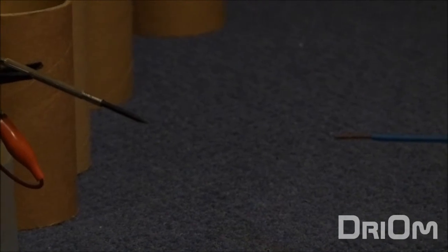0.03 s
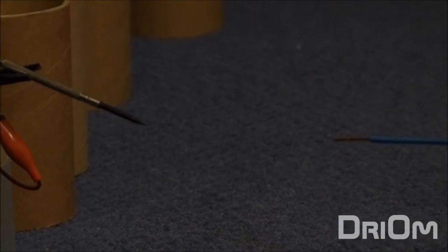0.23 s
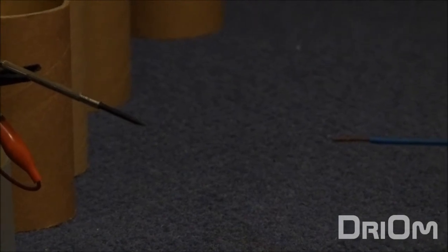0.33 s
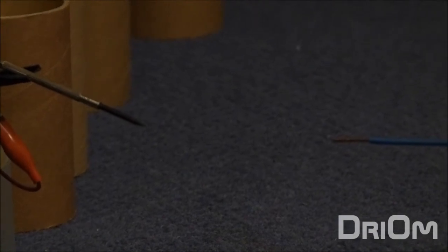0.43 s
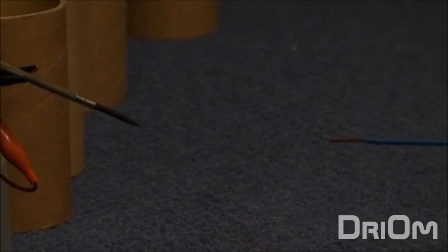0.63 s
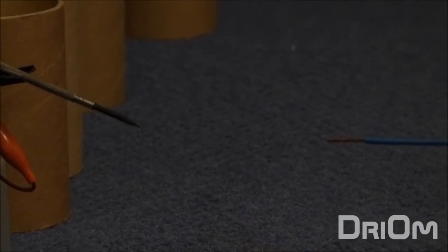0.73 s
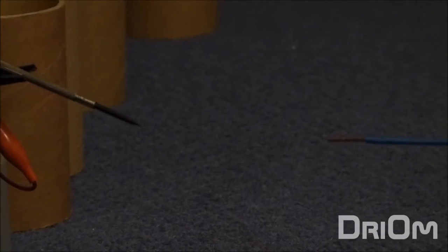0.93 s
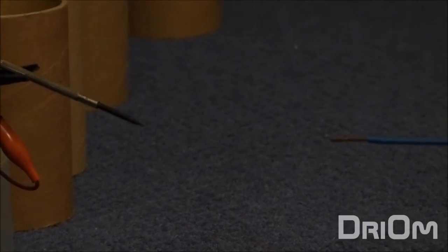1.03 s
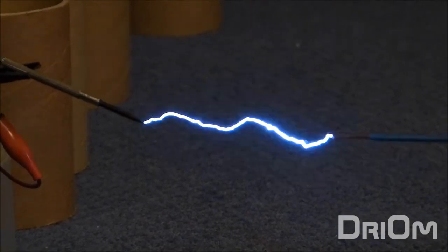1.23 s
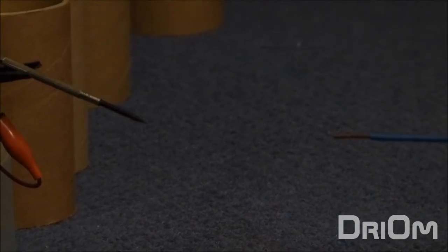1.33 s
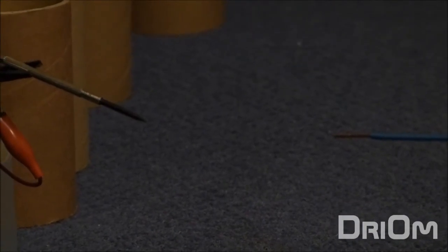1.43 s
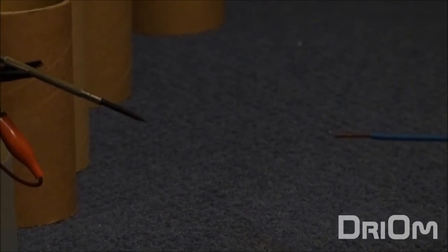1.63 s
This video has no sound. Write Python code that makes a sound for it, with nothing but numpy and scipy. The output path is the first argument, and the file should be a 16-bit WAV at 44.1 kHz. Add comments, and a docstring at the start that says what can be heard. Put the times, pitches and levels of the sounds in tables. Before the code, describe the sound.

An electric spark jumps a gap with a loud, sharp crack. A weaker, brighter snap follows, then another as loud as the first. Each is close to the microphone and rings briefly in a small, quiet room.

```python
"""A small, quiet room hushes and rumbles. Close to a stereo recorder, a high-voltage spark jumps an air gap:
its shock front cracks and overloads the microphones into a dull knock, slaps come off nearby surfaces,
and a bright tail rings out while the limiter, ducked by the hit, slowly recovers.
A weaker, brighter spark follows, then a third as strong as the first, dying away into the room tone."""
import sys
import numpy as np
from scipy import signal
from scipy.fft import rfft, irfft
from scipy.io import wavfile
from scipy.ndimage import uniform_filter1d

SR = 44100
rng = np.random.default_rng(int(sys.argv[2]) if len(sys.argv) > 2 else 0)


def store_pcm(level_fs):
    """Save levels as 16-bit WAV."""
    pcm = np.round(np.clip(level_fs, -1, 1) * 32767).astype(np.int16)
    wavfile.write(sys.argv[1], SR, np.atleast_2d(pcm).T)


N = 74970

# the hits: t/s, level/dB, crackle decay/ms, trims for crackle/dB, knock/dB, snap/dB, thump/dB and room/dB,
# brightness/(dB per octave)
SPARKS = [(0.2220, 9, .6, 0.5, -2.5, -3, 2, 0, -0.57), (0.8770, -3, .7, 3, -3.5, -5, -24.5, 2.5, 0.98),
          (1.3004, 8.5, 0.51, -0.5, -4.5, -1, -3.5, -1.5, -0.5)]
# direct sound and slaps, gap to microphones: delay/ms, level/dB, left minus right/dB, crackle/dB
SHOCK_PATHS = [(0, 0.5, -3.5, -3), (1.153, -1, 4.5, 1), (2.62, -4, 1.5, 0), (6.754, -7.5, 9.5, -10.5),
               (8.564, -0.5, -1.5, -7.5), (9.316, -3.5, 11, -2.5), (13.31, -5.5, 0.5, -9),
               (22.08, -13, -9, -8)]
# tone of the crack as the microphones hear it: f/Hz, level/dB
CRACK_EQ = [(60, -32), (300, -29), (800, -20), (1500, -19), (2200, -17.5), (3500, -20.5), (5500, -5.5),
            (6200, -8), (7900, 0.5), (10000, -6.5), (12000, -14), (15500, -18)]
# low knock of the overloaded microphones: f/Hz, level/dB
KNOCK_EQ = [(40, -25.5), (180, -22), (350, -10), (700, 3.5), (1000, 2.5), (1450, -12.5), (3000, -23.5),
            (16000, -60)]
# their midrange snap: f/Hz, level/dB
SNAP_EQ = [(40, -48.5), (1000, -24), (1600, -14), (2200, -3), (3100, .5), (3600, -13.5), (6000, -21.5),
           (16000, -50)]
# the thump that pushes them opposite ways: f/Hz, level/dB
THUMP_EQ = [(40, -25.5), (130, -17), (300, -4), (600, -1.5), (1100, -2.5), (2200, -5.5), (5000, -29),
            (16000, -49.5)]
# tone and length of the room tail: f/Hz, level/dB, t60/s
TAIL_BANDS = [(60, -35, .4), (250, -30.5, 0.52), (770, -24.5, .44), (1174, -17.5, .42), (2080, -14.5, .38),
              (2770, -10.5, 0.37), (3600, -10, .36), (5000, -3, 0.33), (8000, 1, 0.27), (10200, -3.5, 0.24),
              (12500, -15.5, .225), (16000, -26, .2)]
# narrow resonances of things in the room: f/Hz, width/Hz, level/dB, t60/s
OBJECT_RINGS = [(946, 19, -62, 0.74), (1236, 150, -50.5, .4), (1540, 100, -41, .24), (4043, 160, -37, .37)]
# colour of the steady room tone: f/Hz, level/dB
ROOM_TONE_EQ = [(10, -2.5), (25, 1), (60, -3.5), (120, -7), (300, -8.5), (600, -9.5), (1100, -10),
                (2000, -16), (4000, -20), (9000, -23), (15500, -29.5)]
# its stereo width, side against mid: f/Hz, level/dB
ROOM_TONE_WIDTH = [(30, -10), (150, -4.5), (1000, 1.5), (8000, -8)]
# fader ride on its low rumble: t/s, level/dB
RUMBLE_RIDE = [(0, 5), (.2, 0), (.35, -3), (.48, -2), (.56, 3.5), (.8, 2.5), (1.0, -4), (1.1, 2),
               (1.22, 4.5), (1.38, -1.5), (1.55, -4), (1.659, 5.5)]

CRACK_DB, KNOCK_DB, SNAP_DB, THUMP_DB, TAIL_DB, ROOM_TONE_DB = 20, 12.5, 21, 12, 22.5, -65  # layer faders
SIZE = 32768  # samples in one spark with its tail
AGE, FREQ = np.arange(SIZE) / SR, np.fft.rfftfreq(SIZE, 1 / SR)
OPPOSED = np.array([[1], [-1]])  # left and right in opposite polarity


def sparks(tilt_pivot_hz=6000):
    """Every spark fires its shock into the same room; the weak one is brighter and overloads less."""
    tail, out = room_tail(), np.zeros((2, N + SIZE))
    octaves = np.log2(np.maximum(FREQ / tilt_pivot_hz, .5))
    for at_s, db, decay_ms, crackle_db, knock_db, snap_db, thump_db, room_db, tilt_db in SPARKS:
        tilt = causal(undb(tilt_db * octaves))
        air = tilt * (shock(decay_ms, crackle_db) + undb(room_db) * tail)
        start = int(at_s * SR)
        out[:, start:start + SIZE] += undb(db) * irfft(air + mic_overload(knock_db, snap_db, thump_db))
    return out[:, :N]


def shock(decay_ms, crackle_db, size=2048):
    """Spectrum of the front along each path, trailed by crackle from the bends of the spark channel."""
    arrivals = np.zeros((2, size))
    for delay_ms, db, pan_db, scatter_db in SHOCK_PATHS:
        crackle = stereo_noise(side_db=-7, size=size) * np.exp(-AGE[:size] * 1000 / decay_ms)
        front = undb(scatter_db + crackle_db) * crackle / np.sqrt(np.sum(crackle ** 2) / 2)
        front[:, 0] += 1  # the clean click of the front itself
        arrivals += undb(db) * pan(pan_db) * np.roll(front, int(delay_ms * SR / 1000), axis=1)
    return rfft(arrivals, SIZE) * causal(undb(CRACK_DB + eq_curve(CRACK_EQ, FREQ)))


def mic_overload(knock_db, snap_db, thump_db, lag_s=0.00017):
    """Spectrum of the microphones recovering from the front: centred knock and snap, lopsided thump."""
    knock = undb(KNOCK_DB + knock_db + eq_curve(KNOCK_EQ, FREQ))
    snap = undb(SNAP_DB + snap_db + eq_curve(SNAP_EQ, FREQ))
    thump = undb(THUMP_DB + thump_db + eq_curve(THUMP_EQ, FREQ))
    lag = np.exp(-2j * np.pi * FREQ * lag_s)
    return (causal(np.hypot(knock, snap)) + causal(thump) * OPPOSED) * lag


def room_tail(onset_s=0.0057, early_db=2, early_s=0.0098, grain_db=2.5, merge_s=0.028, side_db=-10):
    """Spectrum of the reverb: uneven echoes merge into a tail that loses treble first; objects ring on."""
    grain = np.log(undb(grain_db * np.exp(-AGE / merge_s)))  # early echoes stand out singly
    echoes = stereo_noise(side_db) * np.exp(grain * wander(rate_hz=3000, size=SIZE) - grain ** 2 / 2)
    spectrum = rfft(echoes) * undb(TAIL_DB + eq_curve(TAIL_BANDS, FREQ)) / np.sqrt(SR / 20)
    band_hz, _, band_t60 = np.array(TAIL_BANDS).T
    tail = 0
    for solo, t60 in zip(np.eye(len(band_hz)), band_t60):
        band = irfft(spectrum * np.interp(FREQ, band_hz, solo))
        tail += band * fade(t60)
    excitation = rfft(stereo_noise(side_db))
    for hz, width, db, t60 in OBJECT_RINGS:
        ring = irfft(excitation / (1 + (2 * (FREQ - hz) / width) ** 2))
        tail += undb(db) * ring / np.std(ring) * fade(t60)
    attack = 1 - np.exp(-(AGE / onset_s) ** 2)
    early_lift = 1 + undb(early_db) * np.exp(-AGE / early_s)
    return rfft(pan(-0.05) * attack * early_lift * tail)


def room_tone(rumble_hz=130, waver_db=0.5):
    """A quiet bed of room noise and microphone hiss, with a wavering rumble underneath."""
    hz = np.fft.rfftfreq(N, 1 / SR)
    mid, side = rfft(rng.standard_normal((2, N))) * undb(eq_curve(ROOM_TONE_EQ, hz))
    mid, side = irfft(mid, N), irfft(side * undb(eq_curve(ROOM_TONE_WIDTH, hz)), N)
    bed = (mid + side * OPPOSED) / np.std(mid)
    rumble = signal.sosfiltfilt(signal.butter(2, rumble_hz, fs=SR, output="sos"), bed)
    ride_db = np.interp(np.arange(N) / SR, *np.array(RUMBLE_RIDE).T) + waver_db * wander(rate_hz=36)
    return undb(ROOM_TONE_DB) * (bed + rumble * (undb(ride_db) - 1))


def undb(db):
    """Decibels to gain."""
    return 10 ** (np.asarray(db) / 20)


def eq_curve(table, hz):
    """A table's level in dB along a log-frequency axis."""
    points = np.array(table, float)
    return np.interp(np.log(hz + 1e-3), np.log(points[:, 0]), points[:, 1])


def fade(t60):
    """A decay that falls 60 dB in t60 seconds."""
    return np.exp(-np.log(1000) * AGE / t60)


def pan(db):
    """Channel gains with left db above right."""
    return undb(OPPOSED * db / 2)


def stereo_noise(side_db, size=SIZE):
    """Unit white noise whose side level sets its width."""
    mid, side = rng.standard_normal((2, size))
    return (mid + undb(side_db) * side * OPPOSED) / np.hypot(1, undb(side_db))


def wander(rate_hz, size=N):
    """A modulator gliding between random values, rate_hz of them a second."""
    return np.interp(np.arange(size) * rate_hz / SR, np.arange(size), rng.standard_normal(size))


def causal(gain):
    """Spectrum of the tightest hit with this tone and no pre-ring (minimum phase)."""
    cepstrum = irfft(np.log(gain + 1e-9))
    cepstrum[1:SIZE // 2] *= 2
    cepstrum[SIZE // 2 + 1:] = 0
    return np.exp(rfft(cepstrum))


def scene():
    """Three sparks over the room tone."""
    return sparks() + room_tone()


def record(dry, threshold_db=-8, detect_s=.004, release_db_per_s=51.5, top_hz=15750):
    """The limiter ducks at once and recovers steadily; peaks are soft-clipped and the top is rolled off."""
    power = uniform_filter1d(np.mean(dry ** 2, axis=0), int(detect_s * SR))
    over_db = np.maximum(10 * np.log10(np.abs(power) + 1e-12) - threshold_db, 0)
    recovery_db = release_db_per_s * np.arange(N) / SR
    duck_db = np.maximum.accumulate(over_db + recovery_db) - recovery_db
    rounded = np.tanh(dry * undb(-duck_db))
    return signal.sosfilt(signal.ellip(8, .2, 70, top_hz, fs=SR, output="sos"), rounded)


dry = scene()
out = record(dry)
store_pcm(out)
```